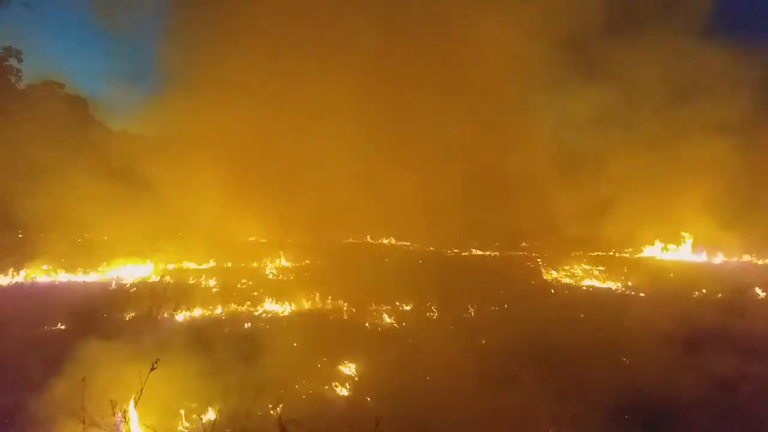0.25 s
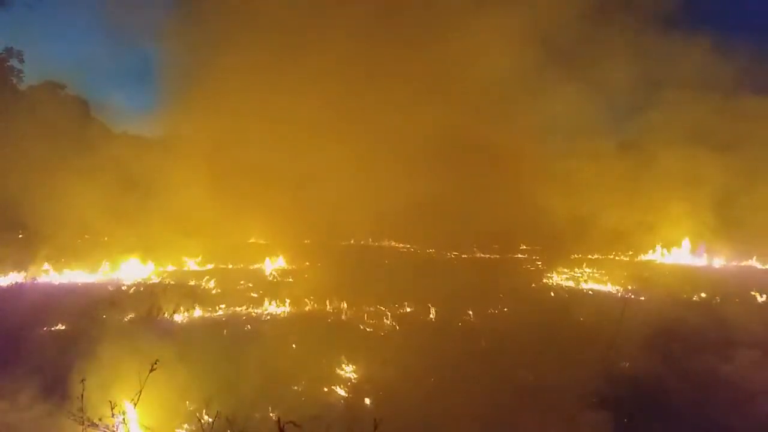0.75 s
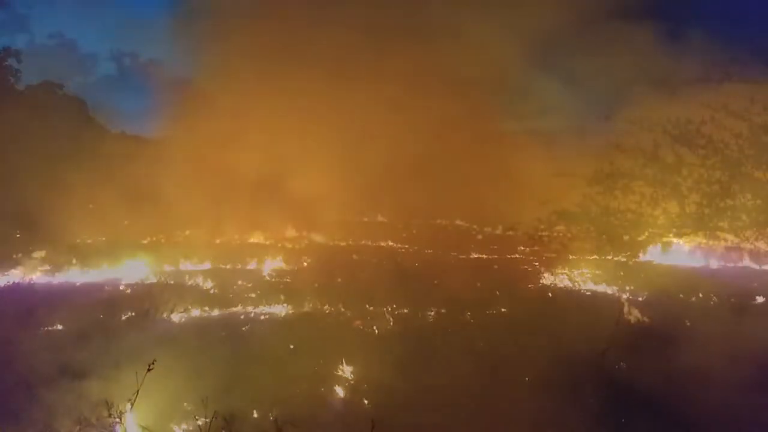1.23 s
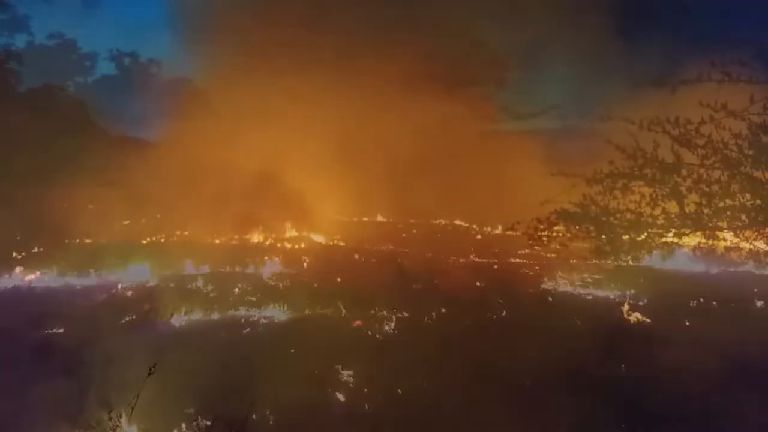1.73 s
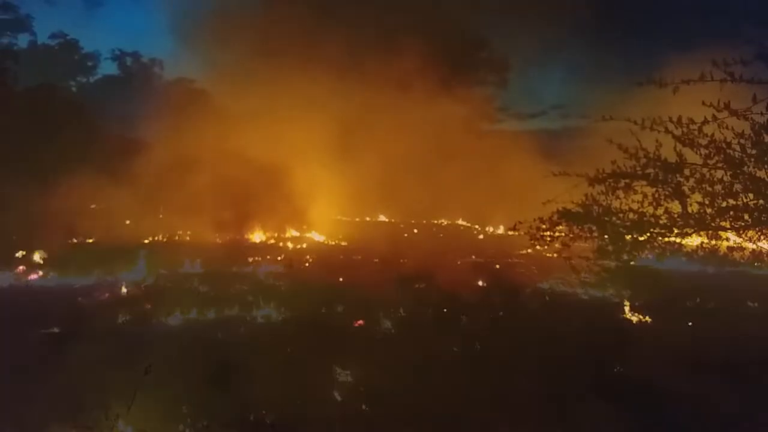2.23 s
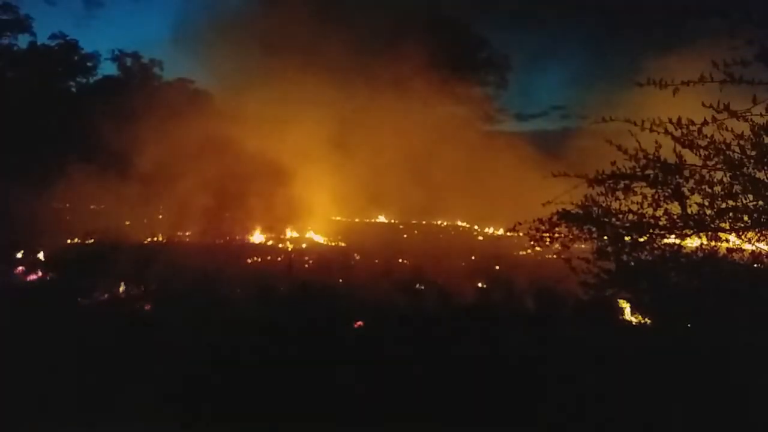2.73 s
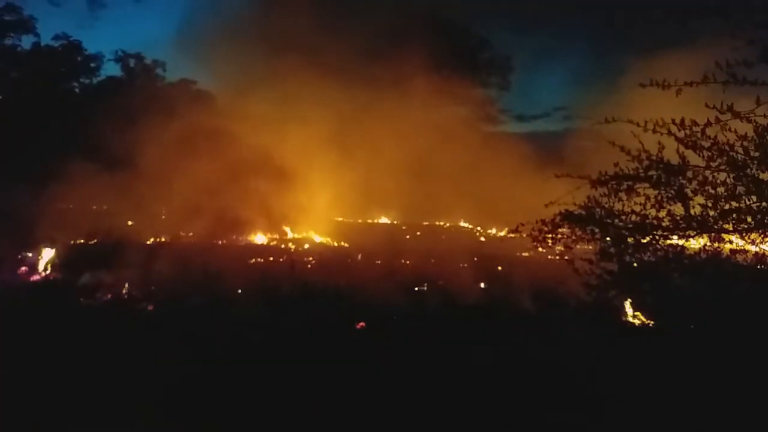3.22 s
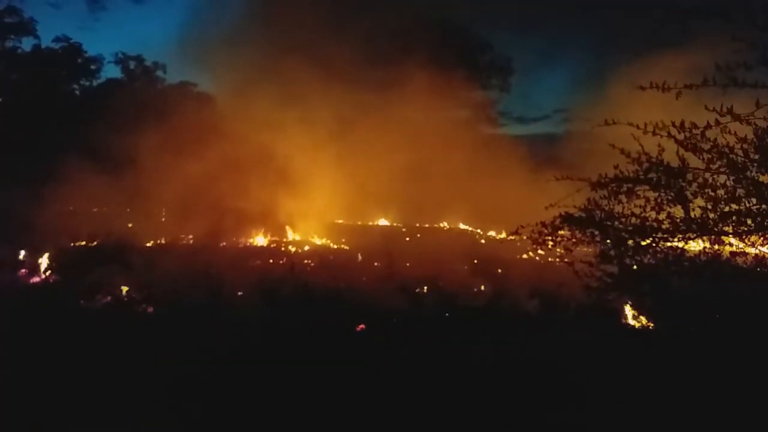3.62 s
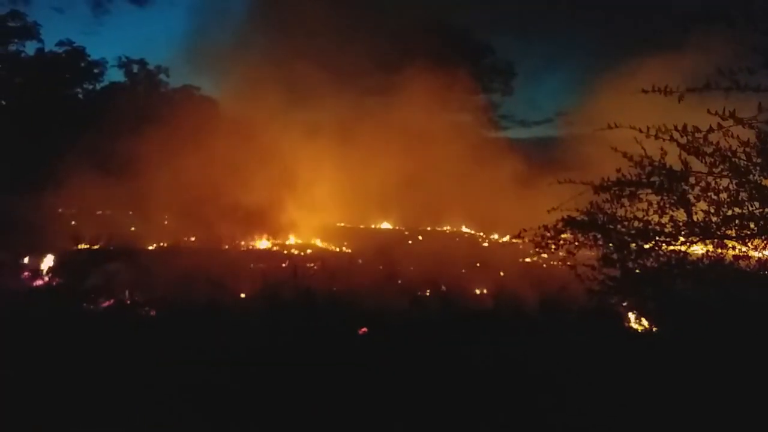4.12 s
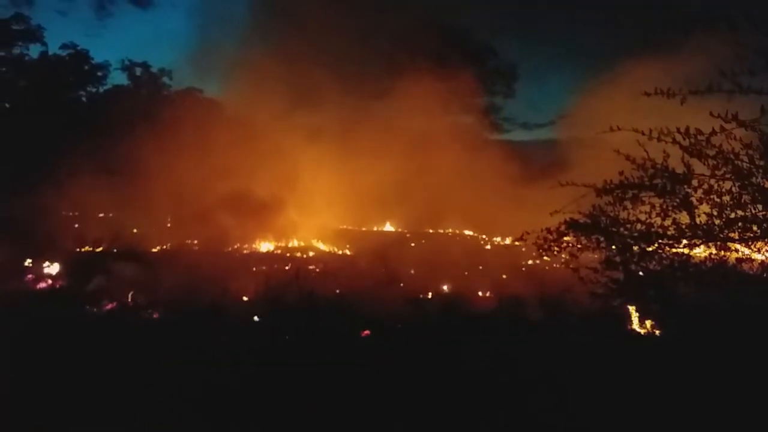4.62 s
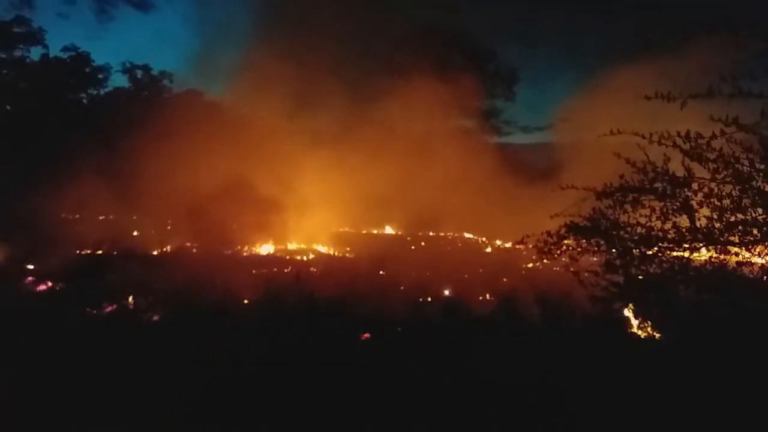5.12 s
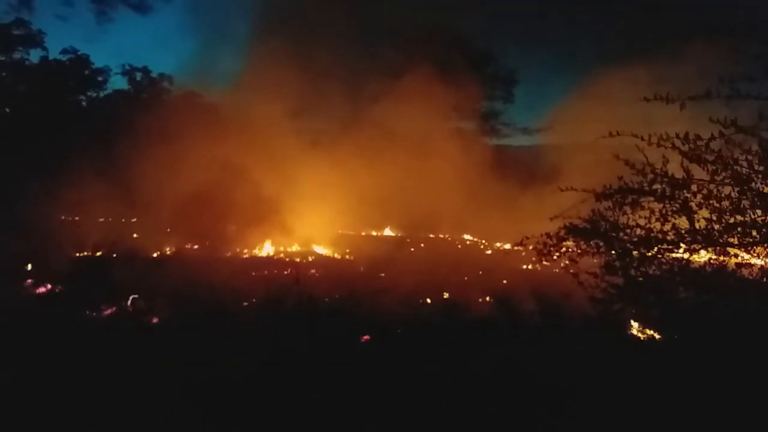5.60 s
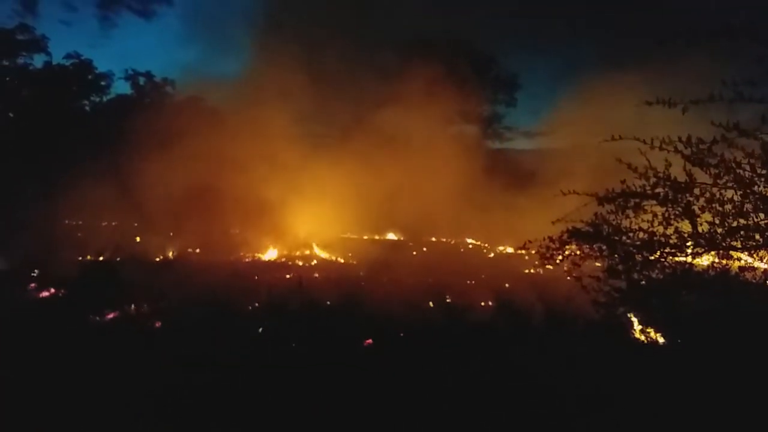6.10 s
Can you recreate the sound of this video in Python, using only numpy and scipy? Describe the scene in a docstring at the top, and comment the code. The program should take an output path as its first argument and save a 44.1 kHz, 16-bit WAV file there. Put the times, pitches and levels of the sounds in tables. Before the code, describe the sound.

Outdoors at dusk, a grass and scrub fire burns near the microphone. From 0 s there is a fine, dry hiss full of tiny ticks and sputtering flurries, with sharp bright pops; the strongest snap comes almost at once, and many more crowd the first 1.7 s. Beneath lies a soft, uneven low flutter, with a muffled rush that sinks away by about 2.5 s. Around 2 s the near crackle softens and pops become sparser and weaker, while the dull patter of a distant fire line rises. Very faint, soft hoots come from afar at about 1.8, 2, 2.9, 3.3 and 4.3 s. From 2.2 s a cricket chirps in quick, regular, high throbbing pulses, about eight per second. From 4.3 s an airy mid-high whistle, perhaps a night bird, bends through short wavering notes with faint tree echoes. Two brighter snaps stand out near 6.2 s as the burning continues.

```python
"""A grass and scrub fire burns across a field at dusk.
From the start: noise hiss, random ticks, flurries and sharp noise-burst pops, over low filtered-noise flutter.
A rush above the flutter sinks away; the far front's dull patter, very faint at first, rises after 2 s.
From 1.8 s, faint far hoots (sinking sines with narrow noise); from 2.2 s, a close cricket (throbbing sine).
From 4.3 s, a far whistle: airy notes that bend in pitch, with echoes; hoots and whistle are perhaps night birds."""
import sys
import numpy as np
from scipy import signal
from scipy.fft import rfft, irfft
from scipy.io import wavfile
from scipy.ndimage import uniform_filter1d

SR = 44100
rng = np.random.default_rng(int(sys.argv[2]) if len(sys.argv) > 2 else 0)


def unload_audio(sound):
    """Save the sound as a 16-bit wav file, at the path given as the first command line argument."""
    columns = np.transpose(np.atleast_2d(sound))
    # keep every value between -1 and 1, then stretch to whole-number steps
    steps = np.round(np.clip(columns, -1, 1) * 32767)
    wavfile.write(sys.argv[1], SR, steps.astype(np.int16))


N = 280035
TIME = np.arange(N) / SR

# fuel voices from thick to fine, wood, stalks, blades, tips: (low edge [Hz], high edge [Hz])
FUEL_BANDS = [(350, 1900), (1900, 4300), (4300, 8800), (8800, 16000)]
# steady burning, before the hiss and tick trims: (time [s], blades [dB], stalks [dB])
BURN_LEVELS = [(0.0, -50, -61), (0.41, -51.5, -59.5), (0.65, -53, -64), (1.08, -53, -63),
               (1.2, -51.5, -65.5), (1.68, -53, -62), (2.0, -58, -69.5), (2.19, -57.5, -64.5),
               (2.33, -58.5, -64), (3.27, -57.5, -62), (3.43, -56, -61.5), (3.82, -61, -66.5),
               (4.05, -55, -63), (4.3, -57, -62), (4.65, -58.5, -65.5), (5.06, -57, -65),
               (5.48, -60.5, -66.5), (6.35, -58.5, -66.5)]
# loudest bursting stalks: (time [s], blades energy [dB], brightness [dB], woody thud energy [dB],
# share of splintering after the crack [0-1], ring [Hz])
LOUD_POPS = [(.0079, -16.5, 6, -50, 0.1, 7700), (.019, -15, -7.5, -33.5, 0.2, 4300),
             (0.048, -26, -3, -53, 0, 7700), (0.0686, -3.5, 0.5, -34, .22, 7200),
             (.2172, -27.5, 13, -55, .3, 13500), (.2608, -14, 8, -43, 0.2, 11100),
             (0.3302, -46, 2, -31, 0.9, 600), (.372, -11, 2, -64, .24, 6700),
             (0.437, -19.5, 2, -33.5, .4, 7500), (.4688, -22, 9, -53, 0.3, 7600),
             (.504, -19.5, -8, -41, 0.3, 5760), (.551, -21, -3, -56, 0.5, 6000),
             (0.6187, -16, 4.5, -43, 0.14, 6940), (0.8043, -17, 3.5, -58, 0.3, 7940),
             (0.8402, -13, -3, -26, 1, 8200), (0.8851, -18, -5, -30, 0.03, 7800),
             (.8932, -12, 3, -41, 0.25, 9000), (0.9327, -17, -5, -48, 0.02, 7500),
             (0.946, -20.5, -2.5, -26.5, 0.13, 2760), (0.957, -23, -4, -47, 0.1, 7800),
             (.99, -20, 3.5, -46, 0.2, 4700), (1.0501, -22.5, -1, -59, 0.1, 4200),
             (1.0817, -19, 1, -67, 0.2, 7900), (1.1807, -12.5, 0, -42, 0, 5340),
             (1.1904, -14.5, -4, -33, 0.65, 6950), (1.2765, -14.5, 2, -33, .15, 7840),
             (1.405, -22, 3.5, -55, 0.3, 7350), (1.5051, -16.5, 0, -39, 0.1, 4940),
             (1.556, -36, 0, -26, 0.25, 1390), (1.626, -22, -3, -55, 0.5, 6000),
             (1.662, -31, 16.5, -62, 0, 11500), (1.6991, -18.5, -3, -58, 0.09, 3070),
             (1.7653, -26, 6.5, -54.5, 0, 7800), (1.9676, -31, -1, -35, 0.7, 590),
             (2.034, -27, -1, -70, 0, 7040), (2.2651, -15, 7, -43, 0, 6940),
             (2.3455, -26.5, 4.5, -35.5, 0.2, 4830), (2.4353, -24.5, 0, -42, 0.5, 6800),
             (2.458, -25, 4, -60, 0.04, 6570), (2.623, -27.5, 1.5, -54, 0.97, 4970),
             (2.68, -29, -2, -54, .7, 3480), (2.7273, -37, 13, -62, 0.07, 15500),
             (2.9424, -35, 2, -32, 0.99, 2070), (3.0462, -28, 1, -36, 0.2, 2140),
             (3.0769, -20, -1, -37.5, 0.05, 8100), (3.1931, -23.5, 4, -58, 1, 10000),
             (3.218, -21, 0, -39, 0.96, 7800), (3.2778, -25.5, 2, -59, 0.5, 5300),
             (3.3708, -23.5, -2, -57, 0.7, 5400), (3.4246, -21.5, 0.5, -38, 0.1, 6650),
             (3.5341, -30, -9, -62, 1, 3970), (3.556, -30, -9, -47, .2, 5700),
             (3.797, -32.5, -5, -65, 0.2, 4040), (3.899, -35, -7.5, -55, 0.6, 3040),
             (4.054, -26, -5, -57, 0.1, 7450), (4.1282, -29.5, 0, -43, 0.9, 4000),
             (4.1886, -23, -5, -59, 0.3, 4300), (4.2456, -21.5, 4, -62, 0.6, 4100),
             (4.2665, -27, -10.5, -46, 1, 2250), (4.409, -23.5, 0.5, -57, 0.3, 1800),
             (4.913, -26, -4.5, -37, .87, 1797), (4.9454, -27.5, -12.5, -47, 0.6, 2300),
             (5.0774, -25.5, 8, -57, 0.99, 7500), (5.2249, -19, 2.5, -45, 0.92, 5360),
             (5.321, -29, 0, -51, .68, 7700), (5.529, -29.5, -3, -51, 0.37, 4430),
             (5.8183, -27.5, -1, -45, 0.48, 5170), (6.0455, -28, -4, -46, 0.44, 7480),
             (6.1485, -17, -0.5, -43, .95, 6400), (6.1804, -14.5, -0.5, -62, 0.66, 5600),
             (6.278, -26, -3, -45, 0.2, 2580)]
# sputtering tufts: (time of peak [s], half length [s], level before voice trim [dB], woody crunch [dB])
TUFT_FLURRIES = [(0.114, 0.008, -52, -77), (0.2, 0.023, -51.5, -76), (.446, .018, -49.5, -73),
                 (.593, 0.0039, -44.5, -65), (0.619, .01, -49, -63.5), (.885, 0.035, -56, -62),
                 (1.209, 0.012, -46.5, -63.5), (1.694, 0.0037, -42.5, -67), (2.44, 0.013, -61, -79),
                 (2.663, 0.022, -55.5, -80), (3.228, 0.0081, -51, -64), (3.273, 0.0071, -50, -73),
                 (3.56, 0.018, -54.5, -74), (3.661, 0.019, -53, -72), (4.127, 0.0033, -47, -68),
                 (4.18, 0.01, -52.5, -79), (4.965, 0.027, -50, -79), (5.102, 0.025, -57, -85)]
# crackle colour: (frequency [Hz], relative density [dB per Hz])
CRACKLE_SPECTRUM = [(300, 4), (520, -14), (900, -9.5), (1400, -15.5), (2000, -14.5), (2550, -9.5),
                    (3400, -7), (4800, -0.5), (6300, 3.5), (7700, 5.5), (8600, -4.5), (9400, -7.5),
                    (10800, -2), (15800, -3.5)]
# flame flutter colour: (frequency [Hz], relative density [dB per Hz])
ROAR_SPECTRUM = [(20, -38), (36, -39), (50, -7.5), (66, -2.5), (108, 2), (160, -2), (210, -4), (320, -12.5),
                 (460, -30), (800, -57.5)]
# flame flutter, before its trim: (time [s], level [dB])
ROAR_LEVELS = [(0.0, -54), (0.03, -57), (1.55, -60), (1.68, -68), (1.71, -62), (2.0, -61), (2.03, -66.5),
               (2.71, -61), (3.77, -63), (4.05, -60), (4.07, -62), (6.35, -65)]
# rush of the nearest flames: (frequency [Hz], relative density [dB per Hz])
RUSH_SPECTRUM = [(200, -14.5), (340, -7), (450, -1), (580, -10), (720, -18.5), (1100, -31)]
# rush of the nearest flames: (time [s], level [dB])
RUSH_LEVELS = [(0, -63), (.8, -66.5), (1.4, -67), (1.6, -70), (1.85, -70.5), (2.15, -74), (2.5, -85),
               (6.35, -94)]
# dull crackle of the far front: (frequency [Hz], relative density [dB per Hz])
FAR_SPECTRUM = [(1100, -27), (1650, -5.5), (2050, -4.5), (2400, -0.5), (3100, -7.5), (3900, 1),
                (5200, -14.5), (9000, -41)]
# far front: (time [s], level [dB])
FAR_LEVELS = [(0, -82), (2.05, -79), (2.4, -68), (3.3, -66), (3.8, -70), (4.3, -63.5), (4.65, -70.5),
              (4.95, -62.5), (5.4, -69.5), (6.35, -67.5)]
# far hoots: (time of middle [s], half length [s], mid pitch [Hz], level of the tone [dB])
FAR_HOOTS = [(1.783, 0.032, 645, -76), (2.039, 0.023, 640, -79), (2.89, .055, 795, -73),
             (3.289, .03, 800, -82), (4.316, 0.038, 805, -77)]
# whistled notes: (start [s], length [s], first pitch [Hz], middle pitch [Hz], last pitch [Hz], level [dB])
WHISTLE_NOTES = [(4.297, 0.21, 1785, 1848, 1767, -51.5), (4.454, 0.052, 1470, 1650, 1726, -63),
                 (4.515, 0.043, 1590, 1573, 1480, -69), (4.639, 0.047, 1470, 1566, 1460, -64),
                 (4.791, 0.088, 1720, 1694, 1670, -70), (4.869, 0.075, 1877, 1714, 1715, -56),
                 (4.937, 0.062, 1682, 1854, 1793, -51.5), (5.047, .155, 1504, 1680, 1367, -62.5),
                 (5.32, 0.033, 1665, 1796, 1730, -57.5), (5.42, 0.115, 1553, 1812, 1470, -56),
                 (5.699, 0.17, 1680, 1700, 1650, -65), (6.082, 0.14, 1664, 1715, 1590, -65)]
# tree-line echoes of the whistle: (delay [s], gain [dB])
TREE_ECHOES = [(0.138, -15), (.205, -17.5), (.275, -13.5)]

WOOD_UNDER_STALKS_DB, TIPS_UNDER_BLADES_DB = 12, 6
# small pops: energy relative to the burning blades, thud relative to the pop
SMALL_POPS_PER_S, SMALL_POP_DB, SMALL_THUD_DB = 9.0, 25, -28
FIRST_CHIRP_S, CHIRP_GAP_S, GAP_SHRINKS_S, CHIRP_JITTER_S = 2.2, .1225, .0002, 0.0032
CUTOFF_HZ = 16100


def from_db(db):
    """Decibels to gain."""
    return 10 ** (np.asarray(db) / 20)


def unit_energy(x):
    """Scale so that the squares sum to one."""
    return x / np.sqrt(np.sum(x ** 2) + 1e-20)


def rms_one(x):
    """Scale to an rms of one."""
    return unit_energy(x) * np.sqrt(len(x))


def in_time(rows):
    """One curve per column, joined by straight lines."""
    s, *columns = np.transpose(rows)
    return [np.interp(TIME, s, c) for c in columns]


def add(out, start_s, sound):
    """Mix a sound in at a given time."""
    i = max(0, round(start_s * SR))
    out[i:i + len(sound)] += sound[:max(0, N - i)]


def through(x, response):
    """Pass a sound through an impulse response."""
    return signal.oaconvolve(x, response)[:N]


def drift(corner_hz):
    """Slow random curve with an rms of one: low-passed noise."""
    step = 40  # computed at SR / 40, then interpolated
    r = np.exp(-2 * np.pi * corner_hz * step / SR)
    noise = rng.standard_normal(N // step + 2002)
    slow = signal.lfilter([1], [1, -2 * r, r * r], noise)[2000:]  # drop the settling
    return np.interp(np.arange(N) / step, np.arange(len(slow)), rms_one(slow))


def colour(spectrum, size=8192):
    """Causal (minimum-phase) impulse response of the given spectral shape; unit energy."""
    hz, db = np.transpose(spectrum)
    grid_hz = np.maximum(np.arange(size // 2 + 1) * SR / size, 1)
    grid_db = np.interp(np.log(grid_hz), np.log(hz), db)
    cepstrum = irfft(np.log(from_db(grid_db)))
    # fold the cepstrum to make it causal
    cepstrum[1:size // 2] *= 2
    cepstrum[size // 2 + 1:] = 0
    return unit_energy(irfft(np.exp(rfft(cepstrum)))[:size // 2])


def scatter(swell_s, t60_s):
    """Diffuse reflections: noise that swells in while it decays by 60 dB per t60; unit energy."""
    t = np.arange(int((swell_s + t60_s) * SR)) / SR
    swell = np.minimum(t / swell_s, 1) ** 2
    return unit_energy(rng.standard_normal(len(t)) * swell * from_db(-60 * t / t60_s))


def resonate(x, hz, sharpness):
    """One resonance, with a gain of one at its top."""
    b, a = signal.iirpeak(hz, max(sharpness, 1), fs=SR)
    return signal.lfilter(b, a, x + 1e-18)


def burning():
    """Level of the four voices [dB]: wood burns along with the stalks, tips along with the blades."""
    blades, stalks = in_time(BURN_LEVELS)
    return np.array([stalks - WOOD_UNDER_STALKS_DB, stalks, blades, blades - TIPS_UNDER_BLADES_DB])


def ticks(per_s, spread_db, clump_db):
    """Many small bursts, in clumps, mostly weak and a few strong; rms one."""
    born = rng.random(N) < per_s * from_db(clump_db * drift(14)) / SR
    sizes = from_db(spread_db * np.minimum(rng.exponential(1, N), 3.0))
    return rms_one(born * sizes * rng.choice([-1, 1], N))


def rustling(near, own_db, fibre_decay_s=0.0015, rustle=2.7):
    """Each tick gets a strength of its own in this voice and trails a brief rustle of fibres."""
    own = rms_one(near * from_db(own_db * np.clip(rng.standard_normal(N), -1.5, 1.5)))
    trail_power = signal.lfilter([1], [1, -np.exp(-1 / (fibre_decay_s * SR))], own ** 2 + 1e-18)
    fibres = rms_one(np.sqrt(trail_power) * rng.standard_normal(N))
    return rms_one(own + rustle * fibres)


def sputter():
    """Gains of flurries and woody crunch: tufts catch, swelling and fading as bell curves in power."""
    flurry_power, crunch_power = np.zeros(N), np.zeros(N)
    for peak_s, half_s, level_db, crunch_db in TUFT_FLURRIES:
        bell = np.exp(-np.minimum(((TIME - peak_s) / half_s) ** 2, 60))
        flurry_power += from_db(2 * level_db) * bell
        crunch_power += from_db(2 * crunch_db) * bell
    return np.sqrt(flurry_power), np.sqrt(crunch_power)


def burst(splinter, ring_hz, crack_s=0.00037, splinter_s=0.0061, bounce_db=-13, bounce_s=0.00039,
          ring_db=10.5, sharpness=3.4):
    """A stalk wall cracks, fibres tear for a few ms, the hollow rings, rough ground throws the crack back."""
    t = np.arange(SR // 50) / SR

    def decaying_noise(decay_s):
        return unit_energy(rng.standard_normal(len(t)) * np.exp(-t / decay_s))

    share = np.clip(splinter, 0, 1)
    crack = unit_energy(1.3 * (t == 0) + decaying_noise(crack_s))
    fibres = decaying_noise(splinter_s)
    bounce_delay = int(rng.uniform(0.0019, .0028) * SR)
    bounce = from_db(bounce_db) * np.roll(decaying_noise(bounce_s), bounce_delay)
    snap = np.sqrt(1 - share) * crack + np.sqrt(share) * fibres + bounce
    return snap + from_db(ring_db) * resonate(snap, ring_hz, sharpness)


def small_pops(blades_db, spread_db=4.0, bright_spread_db=5.0, splinter=0.21, ring_hz=(4000, 9000)):
    """Lesser pops at random moments, stronger where the blades burn harder; rows as in LOUD_POPS."""
    wait, chance, ring, size, bright = rng.random((100, 5)).T
    s = np.cumsum(-np.log(wait)) / SMALL_POPS_PER_S
    db = np.interp(s, TIME, blades_db) + SMALL_POP_DB + spread_db * (2 * size - 1)
    bright_db = bright_spread_db * (2 * bright - 1)
    rings_hz = np.interp(ring, [0, 1], ring_hz)
    rows = np.transpose([s, db, bright_db, db + SMALL_THUD_DB, splinter * chance, rings_hz])
    return rows[s < TIME[-1]]


def pops(voices, levels_db, stalks_db=6.5, coarse_follows=1.6, tips_db=-5.0):
    """Bursts split over the voices: brightness tilts them, coarser burning fuel gives more body."""
    out = np.zeros(N)
    _, stalks, blades, _ = levels_db
    for s, db, bright_db, thud_db, splinter, ring_hz in [*LOUD_POPS, *small_pops(blades)]:
        i = int(s * SR)
        body_db = stalks_db + coarse_follows * (stalks[i] - blades[i])
        energies_db = (thud_db, db + body_db - bright_db, db, db + tips_db + bright_db)
        snap = burst(splinter, ring_hz)
        for voice, energy_db in zip(voices, energies_db):
            add(out, s, from_db(energy_db) * unit_energy(signal.fftconvolve(snap, voice)))
    return out


def fuel_voice(tone, low_hz, high_hz):
    """The crackle colour limited to one fuel's band; a short impulse response of unit energy."""
    high_pass = signal.butter(5, low_hz, "high", fs=SR, output="sos")
    low_pass = signal.butter(5, high_hz, "low", fs=SR, output="sos")
    return unit_energy(signal.sosfilt(np.vstack([high_pass, low_pass]), tone)[:SR // 80])


def fire(hiss_db=(-2.5, -5, -5.5, -4.5), tick_db=(-4, -3.5, -4, -1.5), flurry_db=(0, -8, -1, -9),
         own_db=5.0):
    """Far burning merges into hiss; nearer ticks, flurries and pops sound in all voices (trims per voice)."""
    near = ticks(per_s=300, spread_db=7.0, clump_db=3.5)
    dense = ticks(per_s=4000, spread_db=4.5, clump_db=1.0)
    flurry, crunch = sputter()
    tone, levels_db = colour(CRACKLE_SPECTRUM), burning()
    voices = [fuel_voice(tone, low_hz, high_hz) for low_hz, high_hz in FUEL_BANDS]
    out = np.zeros(N)
    for k, voice in enumerate(voices):
        crackle = rustling(near, own_db)
        hiss = rng.standard_normal(N) * from_db(.9 * drift(25))
        bed = from_db(levels_db[k]) * (from_db(hiss_db[k]) * hiss + from_db(tick_db[k]) * crackle)
        swell = crunch if k == 0 else flurry  # the wood voice crunches
        out += through(bed + from_db(flurry_db[k]) * swell * dense, voice)
    return out + pops(voices, levels_db)


def flames(roar_trim_db=0.5, flutter_db=0.6):
    """Turbulent hot gas: a soft, uneven rumble, with a rush above it while the near flames stand high."""
    (roar_db,), (rush_db,) = in_time(ROAR_LEVELS), in_time(RUSH_LEVELS)
    roar = from_db(roar_db + roar_trim_db) * through(rng.standard_normal(N), colour(ROAR_SPECTRUM))
    rush = from_db(rush_db) * through(rng.standard_normal(N), colour(RUSH_SPECTRUM))
    return (roar + rush) * from_db(flutter_db * drift(1.9))


def far_front(grain_db=-2.0):
    """The far line of flames: noise and dense patter, dulled by the distance."""
    patter = ticks(per_s=900, spread_db=6.0, clump_db=2.5)
    (level_db,) = in_time(FAR_LEVELS)
    grainy = rms_one(rng.standard_normal(N) + from_db(grain_db) * patter)
    return from_db(level_db) * through(grainy, colour(FAR_SPECTRUM))


def hoots(sharpness=32.0, blur_db=2, fall=0.034):
    """Soft swells that sink a little in pitch, blurred by distance: a sine plus narrow-band noise."""
    out = np.zeros(N)
    for s, half_s, hz, db in FAR_HOOTS:
        position = np.clip((TIME - s) / half_s, -7, 7)  # 0 at the middle of the hoot
        phase = 2 * np.pi * np.cumsum(hz * (1 - fall * position)) / SR
        tone = np.sqrt(2) * np.sin(phase)
        narrow = resonate(rng.standard_normal(N), hz, sharpness)
        blur = rms_one(resonate(narrow, hz, sharpness))
        out += from_db(db) * (tone + from_db(blur_db) * blur) * np.exp(-position ** 2)
    return out


def chirp_times(count=35):
    """Chirp times [s]: the mean gap shrinks a little each time, with jitter."""
    k = np.arange(count)
    even_s = FIRST_CHIRP_S + CHIRP_GAP_S * k - GAP_SHRINKS_S * k ** 2 / 2
    return even_s + CHIRP_JITTER_S * rng.standard_normal(count)


def cricket(level_db=-56.8, start_hz=6250, top_hz=6780, rasp=.016, throb_hz=115.0, throb=.8):
    """Each chirp is a short run of wing strokes gliding up to the ringing pitch; the grass smears it."""
    pitch_hz, level = np.full(N, float(top_hz)), np.zeros(N)
    for s in chirp_times():
        on = np.abs(TIME - s) < .045
        t = TIME[on] - s
        pitch_hz[on] = np.interp(t, [-.035, -.016, -.005], [start_hz, (start_hz + top_hz) / 2, top_hz])
        chirp_gain = from_db(rng.normal())  # 1 dB spread
        strokes = 1 + throb * np.sin(2 * np.pi * (throb_hz * t + rng.random()))
        envelope = np.interp(t, [-.04, -.014, -.007, .007, .024], [0, .3, 1, 1, 0])
        level[on] = chirp_gain * strokes * envelope
    phase = 2 * np.pi * np.cumsum(pitch_hz * (1 + rasp * drift(200))) / SR
    song = from_db(level_db) * level * np.sin(phase)
    return song + from_db(-31) * through(song, scatter(swell_s=0.0056, t60_s=0.038))


def whistle(waver=0.0089, shimmer_db=2.5, octave_db=-27, airy_db=-18, scrub_db=-15, trees_db=-15):
    """Airy notes that bend in pitch, most arching, some sinking; the scrub blurs them, the trees return them."""
    pitch_hz, level = np.full(N, 1750.), np.zeros(N)
    for s, length_s, first_hz, middle_hz, last_hz, db in WHISTLE_NOTES:
        on = (TIME >= s) & (TIME < s + length_s)
        from_middle = np.abs(2 * (TIME[on] - s) / length_s - 1)  # 1 at the ends, 0 at the middle
        end_hz = np.where(TIME[on] < s + length_s / 2, first_hz, last_hz)
        pitch_hz[on] = middle_hz + (end_hz - middle_hz) * from_middle ** 2
        level[on] = from_db(db) * np.sqrt(2) * (1 - from_middle ** 3)
    phase = 2 * np.pi * np.cumsum(pitch_hz * (1 + waver * drift(70))) / SR
    level = uniform_filter1d(level, size=300) * from_db(shimmer_db * drift(44))
    air = drift(170) * np.sin(phase) + drift(120) * np.cos(phase)
    call = level * (np.sin(phase) + from_db(octave_db) * np.sin(2 * phase) + from_db(airy_db) * air)
    out = call + from_db(scrub_db) * through(call, scatter(swell_s=0.021, t60_s=0.21))
    out += from_db(trees_db) * through(call, scatter(swell_s=0.05, t60_s=1.0))
    for delay_s, db in TREE_ECHOES:
        add(out, delay_s, from_db(db) * call)
    return out


def scene(field_db=-16):
    """Open field: the scrub scatters a faint tail behind the near fire."""
    crackle = fire()
    field = from_db(field_db) * through(crackle, scatter(swell_s=0.0075, t60_s=0.43))
    return (crackle + field + flames() + far_front() + hoots() + cricket() + whistle())[None]


def record(dry):
    """Steep elliptic low-pass: 0.1 dB ripple, 60 dB stop band."""
    return signal.sosfilt(signal.ellip(10, .1, 60, CUTOFF_HZ, fs=SR, output="sos"), dry)


dry = scene()
out = record(dry)
unload_audio(out)
```